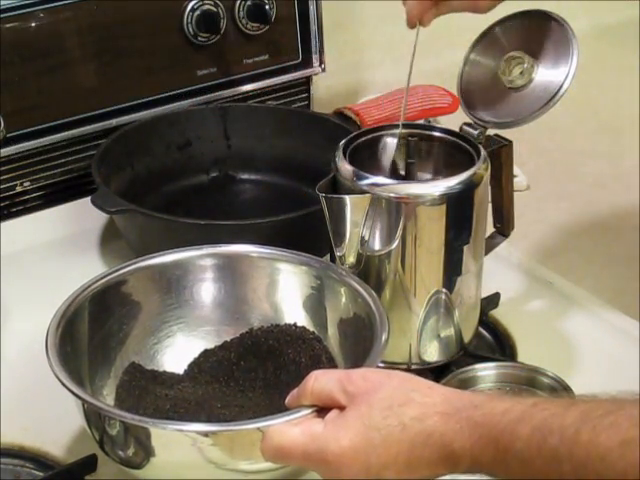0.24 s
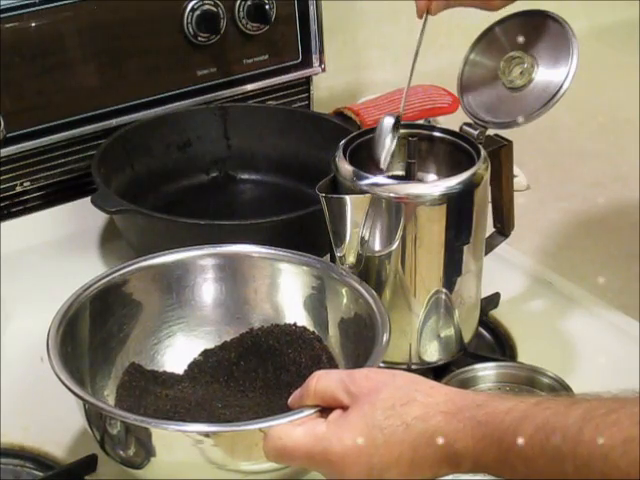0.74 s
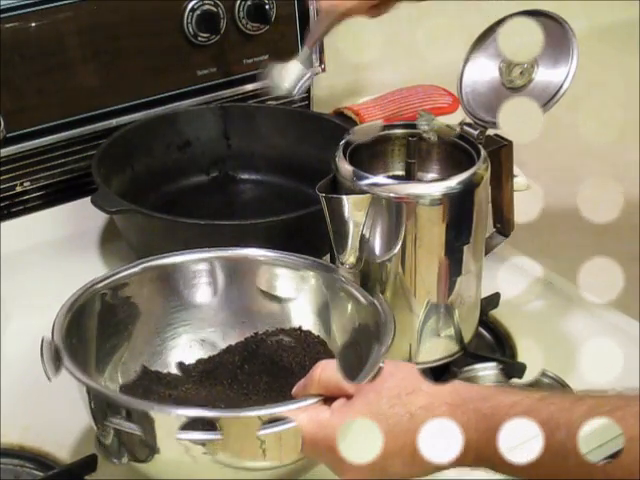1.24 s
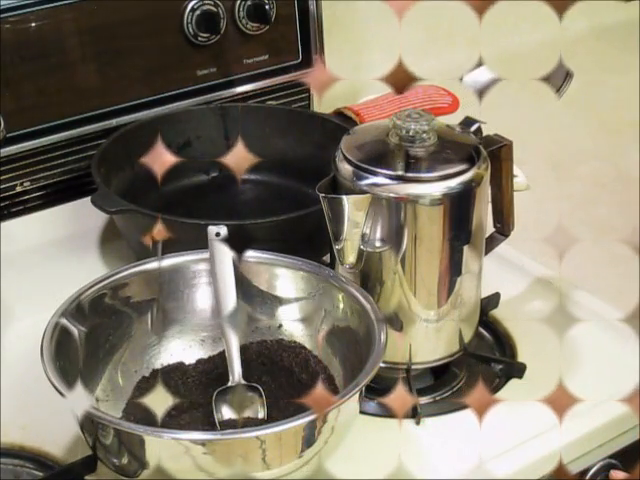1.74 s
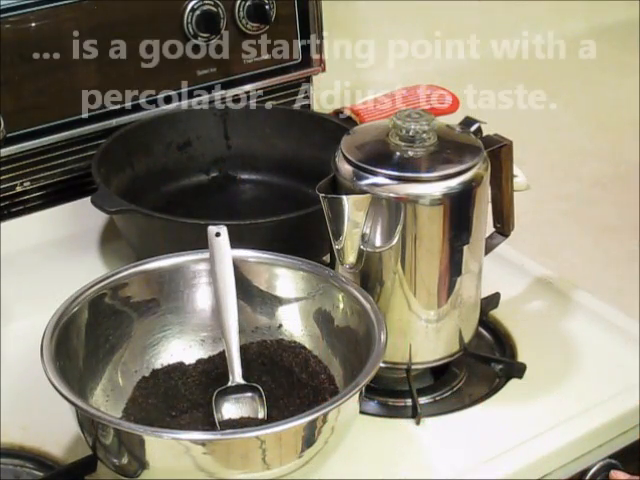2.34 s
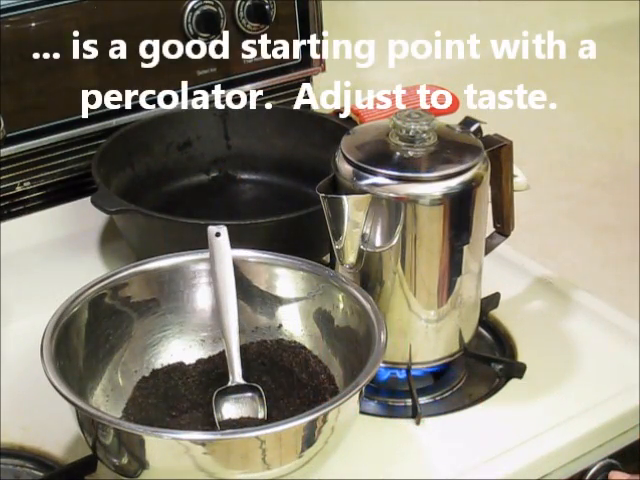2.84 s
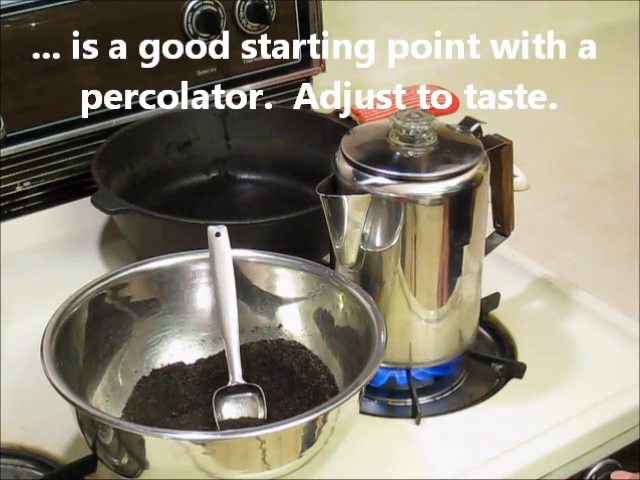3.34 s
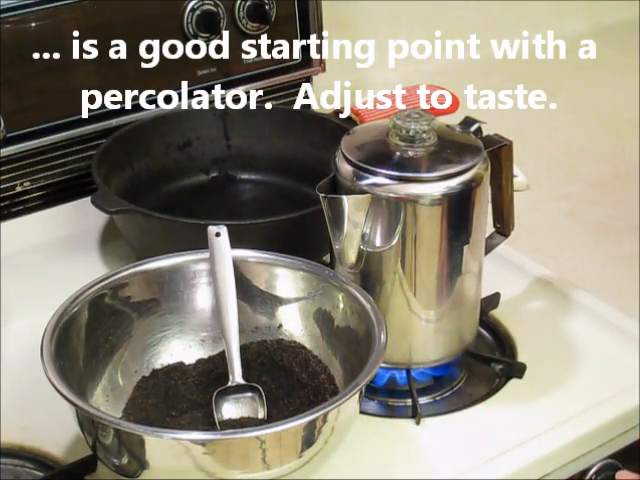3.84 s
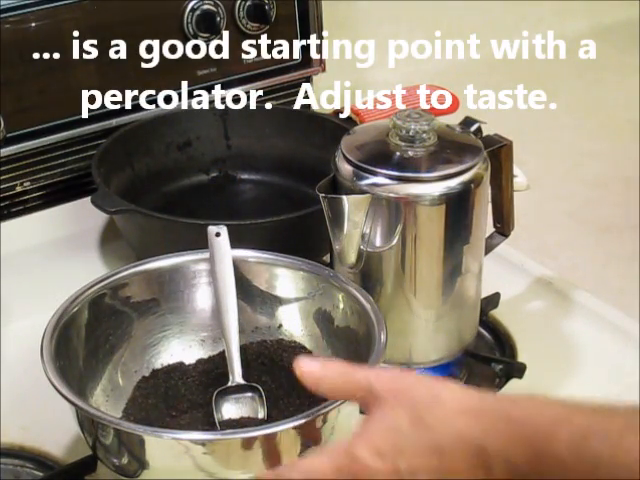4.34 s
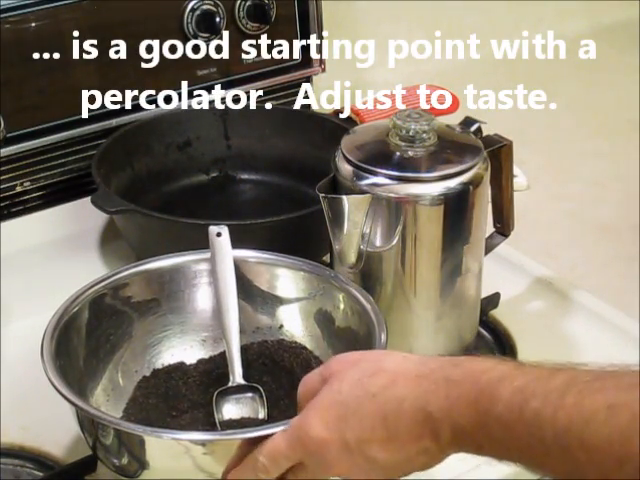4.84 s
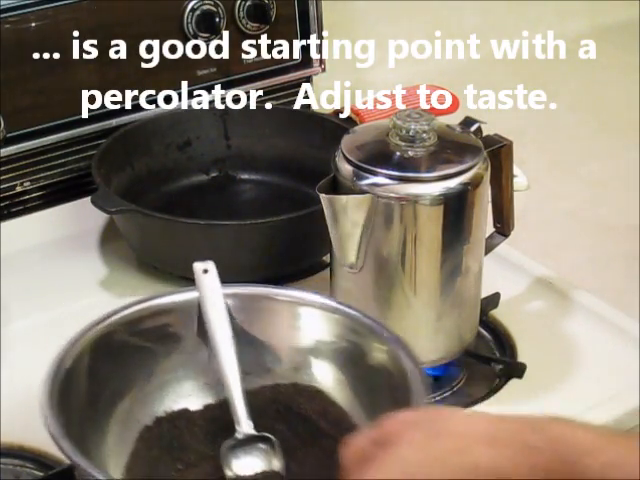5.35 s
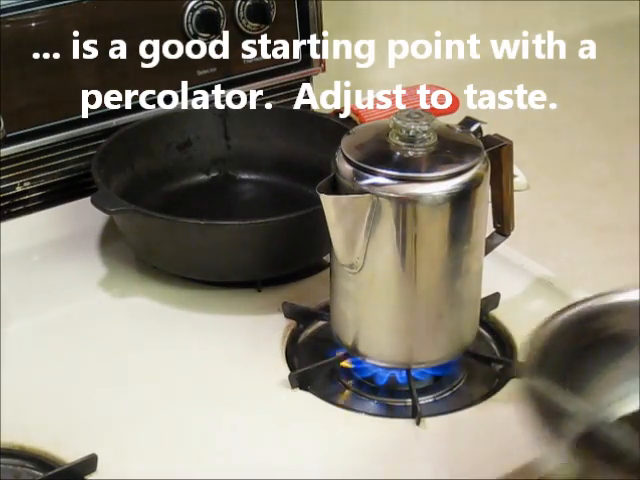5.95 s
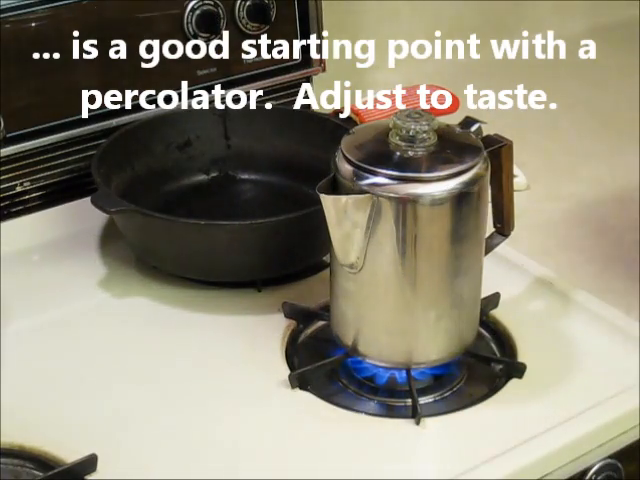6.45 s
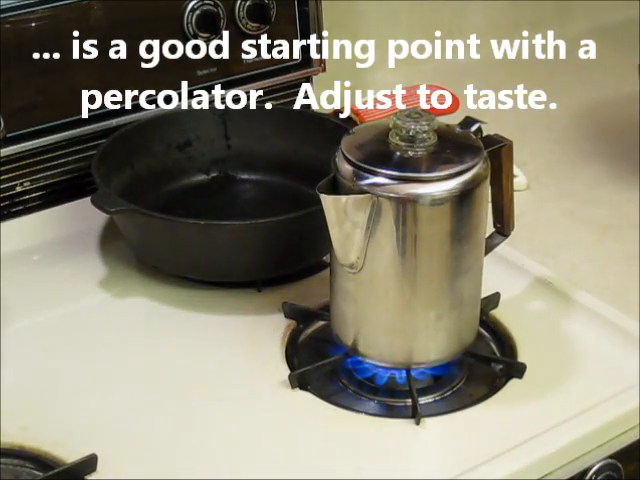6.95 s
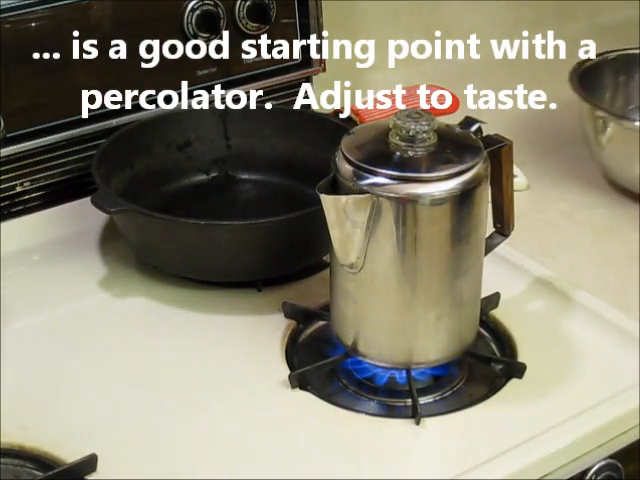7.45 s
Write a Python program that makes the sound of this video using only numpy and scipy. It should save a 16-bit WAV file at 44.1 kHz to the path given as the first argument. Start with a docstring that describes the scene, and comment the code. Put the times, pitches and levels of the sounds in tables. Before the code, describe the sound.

A small kitchen, heard close on one channel with a short bright room response. At 0 s a spoon's metallic touch rings in a steel pot, with faint ticks until 0.4 s, as initial room air fades. A small knob click comes at 0.8 s and a stronger snap at 1.4 s, starting a thin whistling gas hiss. The background swells until 3 s with wavering electrical hum. A spark cracks at 2.26 s, the flame catches with soft pops and low fluttering roar, and another spark cracks at 2.7 s. The loudest, hardest knob snap hits at 3.1 s; a faint click follows at 4 s. From 5.1 to 6.3 s gritty friction makes a steel bowl scrape and ring in uneven bursts. A hollow thump with metallic rattle lands at 7 s, a lighter one at 7.35 s, with sliding to the end.

```python
"""Kitchen stove, pot and bowl

A kitchen; the first room air fades while a fuller background swells in, with wavering hum tones that swell. A
spoon's last touches ring away in a steel pot, the stove knob snaps, gas hisses and whistles; a spark cracks,
the flame catches with soft pops over a low roar, then a second spark cracks. Gritty friction rings a steel bowl
as a spoon scrapes inside it; the bowl thumps down twice on the counter and slides on."""
import sys
import numpy as np
from scipy import signal
from scipy.fft import rfft, irfft, next_fast_len
from scipy.io import wavfile
from scipy.ndimage import map_coordinates

SR = 44100
rng = np.random.default_rng(int(sys.argv[2]) if len(sys.argv) > 2 else 0)


def waveform_to_disk(signal):
    """Save audio, clipped to [-1, 1], as 16-bit WAV at the path in sys.argv[1]."""
    frames = np.transpose(np.atleast_2d(signal))
    scaled = np.clip(frames, -1, 1) * 32767
    samples = np.round(scaled).astype(np.int16)
    wavfile.write(sys.argv[1], SR, samples)


N = 339129  # samples

SWELL_S, FULL_S = 1.39, 3.03  # the background swells between these moments, then holds


def amp(db):
    """Amplitude for a level in dB."""
    return 10 ** (np.asarray(db) / 20)


def unit(x):
    """x scaled to rms 1."""
    return x / np.sqrt(np.mean(x ** 2) + 1e-20)


def ramp(start, end):
    """0 before start, 1 after end (s), straight between."""
    return np.clip((np.arange(N) / SR - start) / (end - start), 0, 1)


def along(points, hz):
    """Read (f/Hz, value) points at hz on a log frequency axis."""
    f, v = np.transpose(points)
    return np.interp(np.log(hz + 1), np.log(f + 1), v)


def gains(rows):
    """Gain per sample from (t/s, level/dB) rows; fades in before the first row and out after the last."""
    s, db = np.transpose(rows)
    times = np.r_[s[0] - .05, s, s[-1] + .1]
    levels = np.r_[db[0] - 30, db, -150]
    return amp(np.interp(np.arange(N) / SR, times, levels, -150))


def wobble(rate, size=N):
    """A smooth random curve, rate knots a second."""
    knots = rng.standard_normal(int(size * rate / SR) + 4)
    return map_coordinates(knots, [np.arange(size) * rate / SR])


def filtered(x, response):
    """x through a complex response of frequency."""
    m = next_fast_len(len(x) + 8192)  # room for the filter's tail
    return irfft(rfft(x, m) * response(np.fft.rfftfreq(m, 1 / SR)), m)[:len(x)]


def peaks(modes):
    """Causal response of (f/Hz, width/Hz, level/dB) resonances, alternating in sign."""
    def response(f):
        total = 0
        for k, (centre, width, db) in enumerate(modes):
            loss = 1j * f * width
            total = total + (-1) ** k * amp(db) * loss / (centre * centre - f * f + loss)
        return total
    return response


def noise(spectrum, size=N):
    """Noise of rms 1, coloured by (f/Hz, level/dB) points."""
    return unit(filtered(rng.standard_normal(size), lambda hz: amp(along(spectrum, hz))))


def blow(spectrum, size=1024):
    """A single causal pulse (minimum phase) coloured by (f/Hz, level/dB) points, peak 1."""
    cepstrum = irfft(np.log(amp(along(spectrum, np.fft.rfftfreq(2 * size, 1 / SR)))))
    cepstrum[1:size] *= 2
    cepstrum[size + 1:] = 0
    pulse = irfft(np.exp(rfft(cepstrum)))[:size]
    return pulse / np.abs(pulse).max()


def add(track, s, x):
    """Mix x into the track at s seconds."""
    part = track[round(s * SR):][:len(x)]
    part += x[:len(part)]


def ring(modes, t):
    """(f/Hz, level/dB, t60/s) modes, each struck at a random strength and phase."""
    total = 0
    for hz, db, t60 in modes:
        strength = amp(db + rng.normal(0, 1.7) - 60 * t / t60)
        total = total + strength * np.sin(2 * np.pi * (hz * t + rng.random()))
    return total


# The kitchen's diffuse reverberation: (f/Hz, t60/s before damping, relative level/dB)
WALL_DECAY = [(200, 0.41, 6), (900, 0.47, 5.5), (1800, 0.53, 3), (4150, 0.38, -0.5), (8000, 0.26, 3),
              (14100, 0.21, 2.5)]
# Single clear echoes: (delay t/s, level/dB under the direct sound)
CLEAR_ECHOES = [(.0048, -17), (0.0104, -14.5)]


def echoed(x, room_db, gap=0.0022, damping=1):
    """x plus the kitchen's answer: a fresh tail in which each frequency dies at its own speed."""
    hz, t, z = signal.stft(rng.standard_normal(SR // 2), SR, nperseg=128)
    t60 = along(np.take(WALL_DECAY, [0, 1], axis=1), hz)[:, None]
    strength_db = along(np.take(WALL_DECAY, [0, 2], axis=1), hz)[:, None]
    decay = amp(strength_db - 60 * damping * t / t60)
    evenness = np.sqrt(t60 * SR / damping / 14)  # offsets the extra energy of a longer tail
    tail = signal.istft(z * decay / evenness, SR, nperseg=128)[1]
    tail[:int(gap * SR)] *= .3  # few paths are as short as the direct one
    for delay, db in CLEAR_ECHOES:
        add(tail, delay, amp([db - room_db]))  # room_db is restored below
    return signal.fftconvolve(x, amp(room_db) * tail) + np.pad(x, (0, len(tail) - 1))


# Colour of the room air: (f/Hz, relative level/dB)
AIR_COLOUR = [(25, -11), (45, -24), (80, -4), (100, -22), (150, -4), (260, -1), (450, -3.5), (800, -7),
              (1500, -12.5), (3000, -17), (6000, -21.5), (12000, -28), (16000, -31)]
# Appliance tones: (f/Hz, relative level/dB, waver level/dB)
HUM_TONES = [(58.8, -2.5, 2.5), (117.5, -8, 2), (213.6, -11.5, 4.5), (11490, -25, -1)]
# Faint bright rubs: (t/s, level/dB, length t/s)
FAINT_RUBS = [(1.83, -57, 0.027), (1.882, -54.5, 0.018), (5.073, -49.5, 0.11)]
AIR_DB, AIR_START_DB, AIR_SETTLES_S = -55, 8.5, 0.58  # level before the swell, extra at first, time constant
AIR_SWELL_DB, HUM_DB, HUM_SWELL_DB, HUM_SWELL_S = 2, -52.5, 4, 2.2  # the hum swells from HUM_SWELL_S


def background():
    """Room air is coloured noise, appliances are wavering sine tones, faint rubs are brief bright noise."""
    t = np.arange(N) / SR
    air_db = AIR_DB + AIR_START_DB * np.exp(-t / AIR_SETTLES_S) + AIR_SWELL_DB * ramp(SWELL_S, FULL_S)
    air = amp(air_db) * noise(AIR_COLOUR)
    tones = sum(amp(db + waver_db * wobble(10)) * np.sin(2 * np.pi * hz * t)
                for hz, db, waver_db in HUM_TONES)
    hum = amp(HUM_DB + HUM_SWELL_DB * ramp(HUM_SWELL_S, FULL_S)) * tones
    rub_gain = sum(amp(db) * np.exp(-((t - s) / length) ** 2) for s, db, length in FAINT_RUBS)
    return air + hum + rub_gain * noise([(4000, -7), (7800, -5.5), (16000, -17)])


# Modes of the steel pot: (f/Hz, level/dB before the touch's tilt, t60/s)
POT_MODES = [(2753, 1, 0.69), (3380, -2, 0.62), (3990, -9, 0.96), (4600, -11, 1.1), (5800, -12, 0.36),
             (6050, -6, .3), (6850, -10, .25), (7838, -8, .4), (8750, -5, .35), (10220, -12, .28),
             (10570, -8, .2), (14180, -12, .25), (14900, -14, .3), (15460, -14, .25)]
# The spoon's touches: (t/s, ring level/dB, rasp level/dB)
SPOON_TOUCHES = [(0.0, -45, -46), (0.045, -60, -46.5), (0.19, -72, -55), (0.25, -76, -57),
                 (0.42, -75.5, -58)]
FLAT_RING_DB, LIGHTNESS = -52, .33  # weaker touches tilt up, in dB per octave for each dB below


def spoon():
    """Touches ring the pot, each with a short noise rasp; the lighter ones favour its high modes."""
    out, t = np.zeros(N), np.arange(SR // 2) / SR
    for s, ring_db, rasp_db in SPOON_TOUCHES:
        light_db = LIGHTNESS * (FLAT_RING_DB - ring_db)
        modes = [(hz, db + light_db * np.log2(hz / 3000), t60) for hz, db, t60 in POT_MODES]
        rasp = amp(rasp_db - 60 * t / .3) * rng.standard_normal(len(t))
        onset = 1 - np.exp(-t / 0.00063)
        add(out, s, (amp(ring_db) * ring(modes, t) + rasp) * onset)
    return out


# Knob snaps: (t/s, level/dB, upper tone f/Hz, then level/dB of lower tone, crack, knock, room)
# The lower tone, crack and knock are relative to the upper tone; the room to the dry snap.
KNOB_SNAPS = [(0.763, -36, 4670, -8, -2, -22, 4), (1.3733, -17, 4850, 0, 2.5, -7, -1),
              (3.0944, 2, 4530, -6.5, -1, -9, -3.5), (3.9973, -41, 4530, -15, -3, -20, -2)]
# The knob's hollow knock: (multiple of KNOCK_HZ, relative level/dB)
KNOB_HOLLOW = [(.7, -30), (1.02, -1), (1.6, 0.5), (2.6, 2), (3.5, 4), (6, -24)]
LOWER_HZ, SNAP_S, KNOCK_HZ = 3630, .0006, 827  # SNAP_S sets the burst's width and delay
THUMP_DB, THUMP_S = -26, 0.00028  # a very short low thump: level relative to the snap, half-width


def knob():
    """The knob's catch is a few cycles of two tones with a crack, a hollow knock and a very short low thump."""
    out, t = np.zeros(N), np.arange(1024) / SR
    crack = blow([(4000, -23), (5900, 2.5), (11000, -1.0), (16000, -3.5)])
    knock = blow(np.multiply(KNOB_HOLLOW, [KNOCK_HZ, 1]))
    swell = np.exp(-(t / SNAP_S - 1.8) ** 2)
    for s, db, hz, lower_db, crack_db, knock_db, room_db in KNOB_SNAPS:
        lower = amp(lower_db) * np.sin(2 * np.pi * LOWER_HZ * t)
        tones = swell * (np.sin(2 * np.pi * hz * t) + lower)
        body = np.roll(amp(crack_db) * crack + amp(knock_db) * knock, int(1.498 * SNAP_S * SR))
        add(out, s, echoed(amp(db) * (tones + body), room_db, gap=0.0026))
        add(out, s, amp(db + THUMP_DB) * np.exp(-((t - 2.0 * SNAP_S) / THUMP_S) ** 2))
    return out


# Colour of the gas jet's hiss: (f/Hz, relative level/dB)
JET_COLOUR = [(1470, -40), (2500, -8), (2990, -1), (6300, -19), (6760, 4), (7130, -6.5), (9290, -2),
              (10800, 1.5), (12300, -5), (16000, -9)]
# Whistling burner ports: (f/Hz, width f/Hz, relative level/dB)
PORT_WHISTLES = [(5930, 43, -7), (6730, 99, -5), (7500, 56, -5.5), (8140, 76, -8.5), (8830, 130, -13),
                 (10000, 50, -3), (10370, 21, -4.5), (10900, 37, 4.5), (11700, 17, -8), (11600, 120, -5.5),
                 (12900, 56, -13), (13300, 48, -32)]
# Colour of the lit flame's roar: (f/Hz, relative level/dB)
ROAR_COLOUR = [(76, -18), (130, -3), (145, -12.5), (207, 2.5), (281, -7), (340, -2), (426, -2), (500, -8.5),
               (723, -7), (862, -7.5), (949, -2), (1100, -11), (6000, -23.5), (7800, -56), (13200, -120)]
# Pops as the flame catches: (t/s, level/dB before the decay)
FLAME_POPS = [(2.389, -40.5), (2.403, -43), (2.441, -41.5), (2.468, -41), (2.494, -41), (2.512, -42.5),
              (2.547, -41), (2.578, -42)]
GAS_DB, GAS_SWELL_DB = -65, 7  # gas level when the tap opens, growth during the swell
LIT_S, ROAR_DB, ROAR_SWELL_DB = 2.3, -52.5, 4.5
ROAR_RISE_DB, ROAR_RISE_S = 0.5, 4.7  # a slight rise late in the roar, and when it starts
POP_T60_S = 0.15


def burner():
    """Gas hisses and whistles in the ports; the lit flame roars low and pops as it catches."""
    whistle = unit(filtered(rng.standard_normal(N), peaks(PORT_WHISTLES)))
    flow = ramp(SWELL_S - .05, SWELL_S) * amp(GAS_DB + GAS_SWELL_DB * ramp(SWELL_S, FULL_S))
    hiss = flow * amp(0.27 * wobble(8)) * (noise(JET_COLOUR) + amp(0.5) * whistle)
    late_db = ROAR_RISE_DB * ramp(ROAR_RISE_S, ROAR_RISE_S + .6)
    flame = ramp(LIT_S - .05, LIT_S) * amp(ROAR_DB + ROAR_SWELL_DB * ramp(LIT_S, FULL_S) + late_db)
    flutter = amp(wobble(6) + 1.07 * wobble(25))
    out = hiss + flame * flutter * noise(ROAR_COLOUR)
    t = np.arange(SR // 10) / SR
    for s, db in FLAME_POPS:
        puff = noise([(100, -8), (300, -1.0), (1000, -3.0), (3000, -15.5), (8000, -29)], size=len(t))
        add(out, s, amp(db - 60 * t / POP_T60_S) * (1 - np.exp(-t / 0.00092)) * puff)
    return out


# Igniter sparks: (t/s, reference level/dB, from which the crack and sizzle are offset)
IGNITER_SPARKS = [(2.257, -13.5), (2.723, -13)]
# Colour of crack and sizzle: (f/Hz, relative level/dB)
SPARK_COLOUR = [(470, -53), (800, -21), (990, -23), (1370, -22), (1550, -16), (2770, -18.5), (4240, -12),
                (5510, -14.5), (8030, -5), (11600, -1.5), (16000, -14)]
CRACK_DB, SIZZLE_DB, SIZZLE_T60_S = -8.5, -6, 0.033  # offsets from the spark's level; the arc's decay


def sparks():
    """A spark is a bright crack that reaches the microphone mostly by the walls, with the arc's brief sizzle."""
    out, t = np.zeros(N), np.arange(1024) / SR
    for s, db in IGNITER_SPARKS:
        crack = amp(db + CRACK_DB) * blow(SPARK_COLOUR)
        add(out, s, echoed(crack, 18.7, gap=0.0004))
        fade = amp(db + SIZZLE_DB - 60 * t / SIZZLE_T60_S) * (1 - np.exp(-t / 0.00045))
        add(out, s, fade * noise(SPARK_COLOUR, size=len(t)))
    return out


# Modes of the steel bowl: (f/Hz, width f/Hz, relative level/dB, t/s at which the contact crosses a belly, # t/s
# between bellies, factor by which the contact's load bends it)
BOWL_MODES = [(1374, 62, 3, 5.47, 1.8, 4), (1583, 52, 6.5, 5.33, 0.57, 3),
              (1770, 46, 10.5, 4.6, 0.668, 2.5), (2350, 15, 1, 5.5, 0.78, 0), (2467, 25, 13, 4.95, 1.6, 1),
              (3053, 35, 8.5, 6, 0.91, 0.5), (3422, 21.6, 17.5, 5.16, 1.42, 0.5),
              (2800, 95, -1, 5.54, 1.1, -1), (3710, 44, 1, 5.4, .9, -0.5), (3910, 37, 7, 5.9, 1.3, -1),
              (4370, 53, 4, 5.82, 0.38, -0.8), (4814, 61, 13.5, 6.175, 0.98, 0.5),
              (5040, 84, 13, 6.27, 1.5, 0.5), (5530, 51, 10, 5.24, 1, -0.5), (5760, 30, -1, 4.7, 0.56, 0),
              (6380, 49, 17.5, 5.84, 0.5, 0.4), (6630, 71, 17, 5.62, 0.52, 0.3),
              (7130, 73, 17, 4.9, .36, 2), (7360, 54, 17.5, 5.38, 0.67, 1),
              (7520, 50, 10.5, 5.73, 2.1, 0.5), (7660, 27, 10, 6.13, 1.5, -0.5),
              (8520, 66, 4, 5.66, 1.1, -0.5), (9100, 49, 10, 5.4, 1.9, 1.2), (10880, 74, 15, 4, 0.368, -1),
              (11120, 90, 8, 4.4, 0.71, 0), (11170, 98, 14, 5.21, 2.6, 1.5),
              (13530, 70, 18, 5.34, 3.1, 1.4), (13800, 67, 14, 6.02, 0.71, 4.5),
              (14100, 71, 9, 5.6, 1.4, -2), (14700, 79, 18, 5.15, 1.6, .7),
              (15480, 78, 13, 5.55, 2.4, -0.5)]
# Strength of the scrape: (t/s, relative level/dB)
SCRAPE_LEVEL = [(5.125, -55), (5.137, -39), (5.16, -40), (5.325, -37.5), (5.345, -27), (5.38, -30.5),
                (5.45, -31), (5.502, -25.5), (5.616, -27.5), (5.682, -30), (5.754, -25), (5.86, -29.5),
                (5.986, -38.5), (6.05, -29.5), (6.142, -35), (6.2, -33), (6.36, -62.5)]
# Colour of the direct grit: (f/Hz, relative level/dB)
GRIT_COLOUR = [(410, -46), (700, -10), (1680, -20), (2770, -42), (4050, -0.5), (5190, -12), (6480, 8),
               (9730, 1), (16000, -1)]
# The load at the scraping contact: (t/s, relative pitch change before each mode's bend factor)
CONTACT_LOAD = [(5.15, -0.0076), (5.35, -0.014), (5.55, -0.0103), (5.85, -0.0204), (6.0, -0.0049),
                (6.25, 0.014)]
# Firmness of the contact: (t/s, relative treble level/dB)
SCRAPE_TREBLE = [(5.12, -30), (5.3, -18), (5.5, -6), (5.96, -0.5), (6.01, 4.5), (6.09, -4), (6.36, -11)]


def scrape():
    """Gritty friction drives the bowl; a mode swells as the contact crosses a belly and sinks near a node."""
    start, stop = int(4.9 * SR), int(6.5 * SR)
    t = np.arange(start, stop) / SR
    roughness = amp(1.24 * wobble(35) + 1.1 * wobble(120) + 0.74 * wobble(600))
    grit = roughness * gains(SCRAPE_LEVEL) * rng.standard_normal(N)
    sharp = filtered(grit, lambda hz: 1 / (1 + (9300 / (hz + 1)) ** 12))  # treble only
    load = np.interp(t, *np.transpose(CONTACT_LOAD))
    firm = gains(SCRAPE_TREBLE)  # a firmer contact is brighter and hisses more
    force = amp(5.5) * (grit + sharp * (firm - 1))[start:stop]
    steel = amp(-2.0) * filtered((grit * firm)[start:stop], lambda hz: amp(along(GRIT_COLOUR, hz)))
    for hz, width, db, s, spacing, give in BOWL_MODES:
        node_db = -20.0 * np.sin(np.pi * (t - s) / spacing) ** 2
        grip = amp(db + node_db + 2.05 * wobble(18, size=len(t)))
        bend = give * load + 0.0024 * wobble(8.83, size=len(t))
        # a one-pole resonator in a frame turning at the mode's bent pitch
        turn = np.exp(2j * np.pi * np.cumsum(hz * (1 + bend)) / SR)
        keep = np.exp(-np.pi * width / SR)
        steel += np.real(turn * signal.lfilter([1 - keep], [1, -keep], force * grip / turn))
    out = np.zeros(N)
    trimmed = filtered(steel, lambda hz: 1 / (1 + (900 / (hz + 1)) ** 4))  # less bass
    add(out, start / SR, echoed(trimmed, -8.5))
    return out


# Set-downs on the counter: (t/s, then level/dB of thud, ring, crack, skid)
# These are drive levels ahead of the colours, foot/edge offsets and decays.
SET_DOWNS = [(7.0103, -12, -21, -21, -29), (7.3454, -22.5, -25.5, -37.5, -34.5)]
# Colour of the counter's push: (f/Hz, relative level/dB)
COUNTER_COLOUR = [(40, -62), (90, 5), (200, 2), (330, 6.5), (480, 2.5), (620, -4.5), (850, 1.5), (1200, -7),
                  (1650, -10.5), (2200, -18.5), (3200, -8), (4200, -51), (8000, -50)]
# The counter's hollow ring: (f/Hz, width f/Hz, relative level/dB)
COUNTER_RING = [(607, 77, 13), (935, 42, 8), (1680, 120, 0), (3230, 170, 5)]
# How a landing drives the bowl's modes: (f/Hz, relative level/dB)
RIM_DRIVE = [(2000, -16), (3300, -15.5), (4700, -6), (5050, 3), (5570, -8), (6450, -6), (7000, -10),
             (7500, -3.5), (8300, -3), (16000, -24)]
# Sliding on the counter: (t/s, level/dB before the skids and flutter)
SLIDE_LEVEL = [(7.13, -53), (7.206, -50), (7.344, -42), (7.488, -38.5), (7.52, -39), (7.69, -40.5)]
# Colour of the slide: (f/Hz, relative level/dB)
RUB_COLOUR = [(590, -35), (1000, -11), (1290, -9), (1400, -14), (2590, -8.5), (7020, 1), (9830, -1),
              (14400, 0.5), (16000, -2)]
ROCK_S, ROCK_DB, FOOT_RING_DB = .0125, -12, -18  # edge delay; edge's thud and foot's ring, relative
SKID_T60_S, ROCK_RISE_S = 0.16, 0.0041  # skid decay; time constant of the ring's onset


def landing():
    """The bowl's foot thumps the counter, it rocks onto its edge, which rings and skids; then it slides."""
    t = np.arange(SR // 4) / SR
    rub = gains(SLIDE_LEVEL)
    rim = [(hz, db - 17.0 + along(RIM_DRIVE, hz), 3.7 / width) for hz, width, db, *_ in BOWL_MODES]
    push = blow(COUNTER_COLOUR, size=len(t))
    knock = -(push + filtered(push, peaks(COUNTER_RING)))
    crack_colour = [(300, -7), (1200, 10), (4000, 7.5), (16000, -17)]
    out = np.zeros(N)
    for s, thud_db, ring_db, crack_db, skid_db in SET_DOWNS:
        add(rub, s + ROCK_S, amp(skid_db - 60 * t / SKID_T60_S))
        for edge in (0, 1):  # foot, then edge
            crack = amp(crack_db - 60 * t / 0.025) * noise(crack_colour, size=len(t))
            thud = amp(thud_db + edge * ROCK_DB) * knock
            bell_gain = amp(ring_db + (1 - edge) * FOOT_RING_DB)
            bell = bell_gain * ring(rim, t) * (1 - np.exp(-t / ROCK_RISE_S))
            add(out, s + edge * ROCK_S, echoed(thud + bell + crack, -1.9, damping=1.32))
    return out + rub * amp(1.0 * wobble(40)) * noise(RUB_COLOUR)


def scene():
    """All the sources in the kitchen, as one channel."""
    return (background() + spoon() + knob() + burner() + sparks() + scrape() + landing())[None]


# The microphone channel's upper band edge: (f/Hz, level/dB)
BAND_EDGE = [(15720, 0), (15820, -30), (16850, -45), (16870, -120)]


def record(dry):
    """Loud peaks flatten; little is kept above the band edge and next to nothing past the cut-off."""
    flat = dry[0] / (1 + np.abs(dry[0] / .97) ** 4) ** (1 / 4)
    return filtered(flat, lambda hz: amp(along(BAND_EDGE, hz)))[None]


dry = scene()
out = record(dry)
waveform_to_disk(out)
```